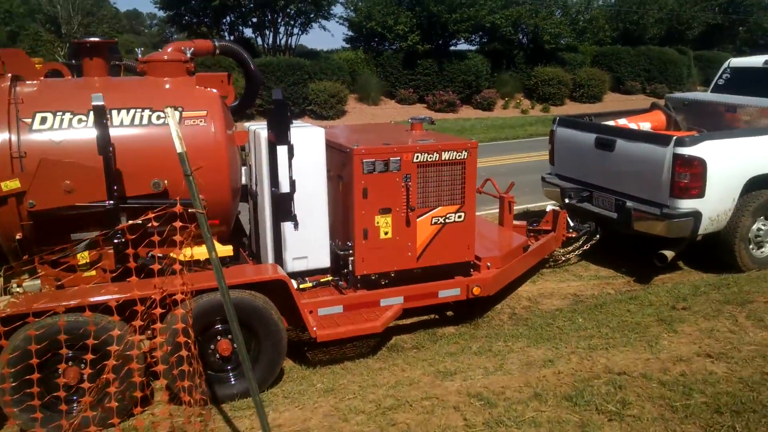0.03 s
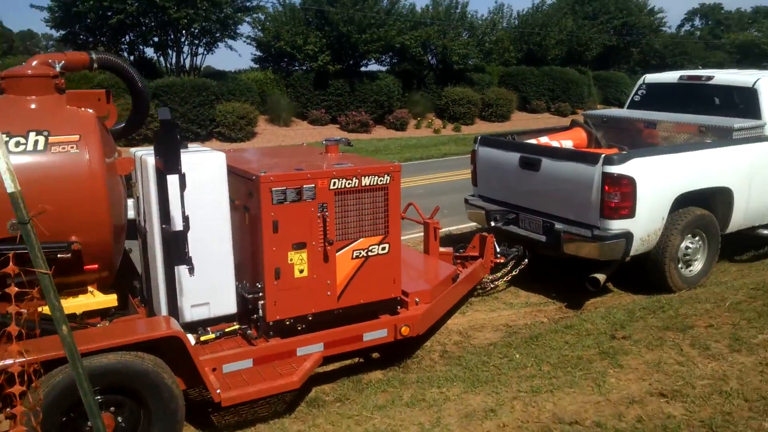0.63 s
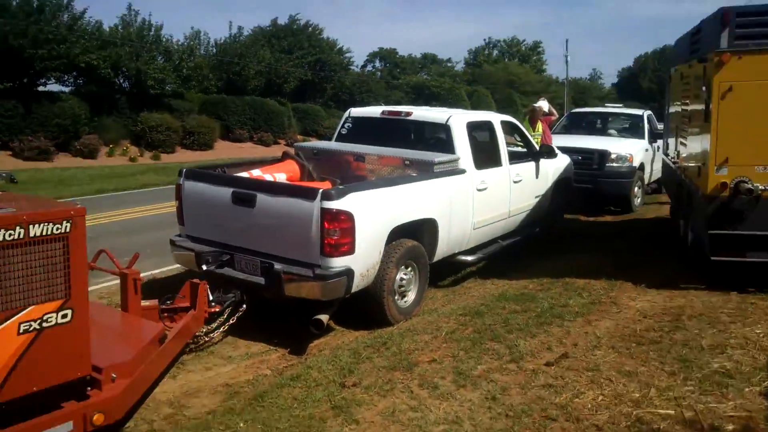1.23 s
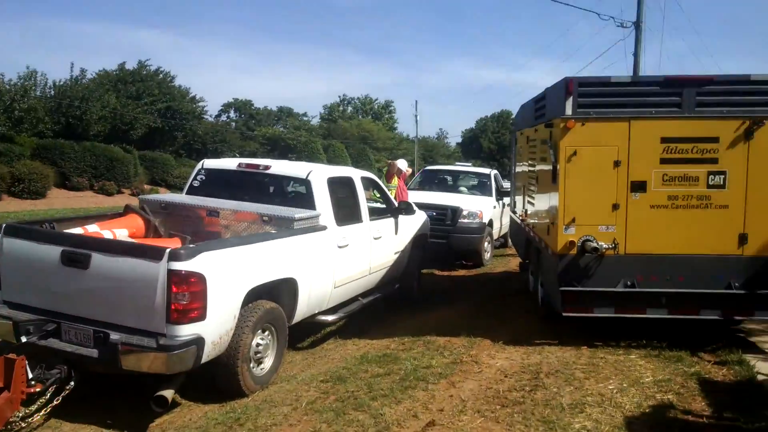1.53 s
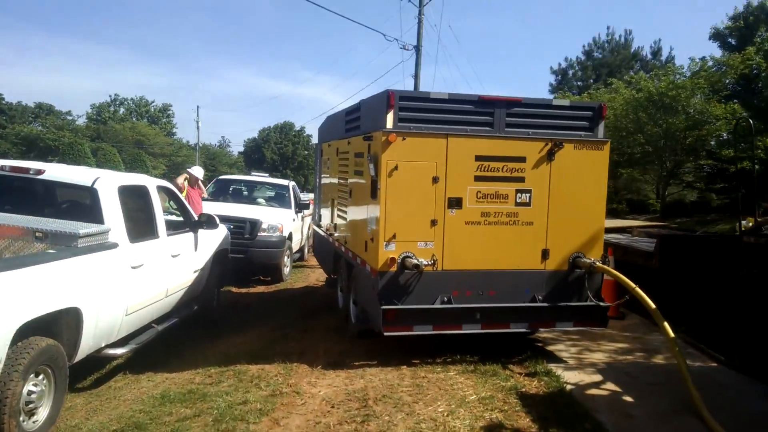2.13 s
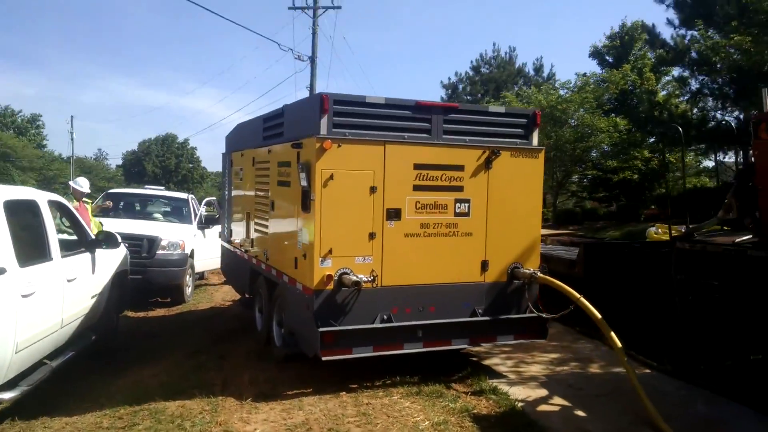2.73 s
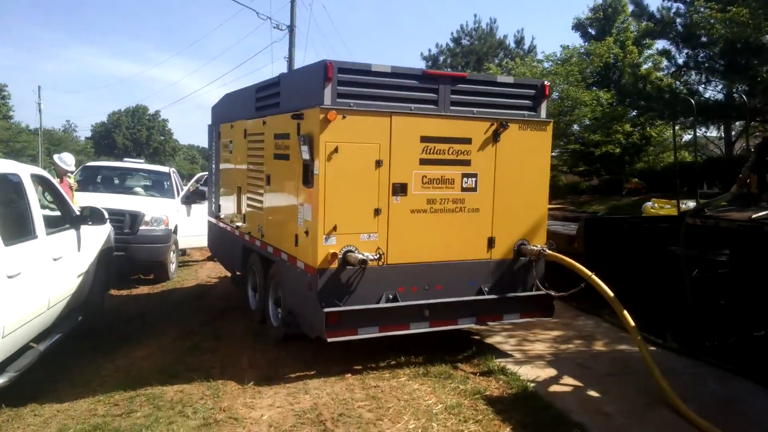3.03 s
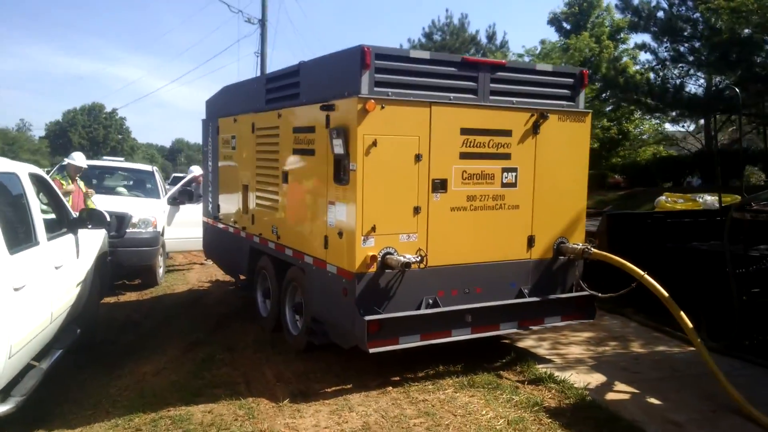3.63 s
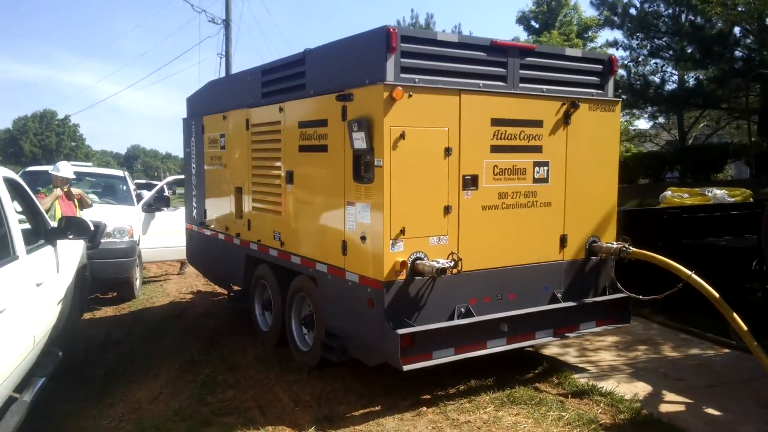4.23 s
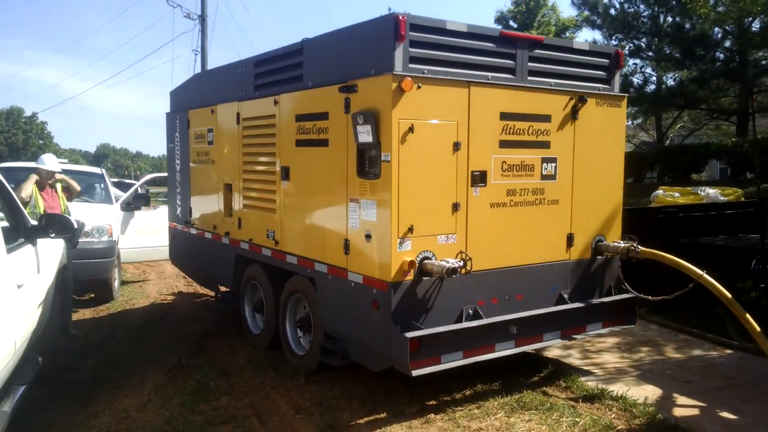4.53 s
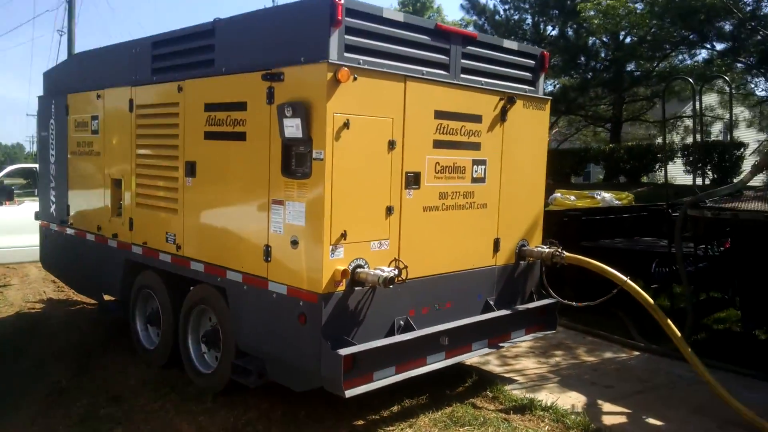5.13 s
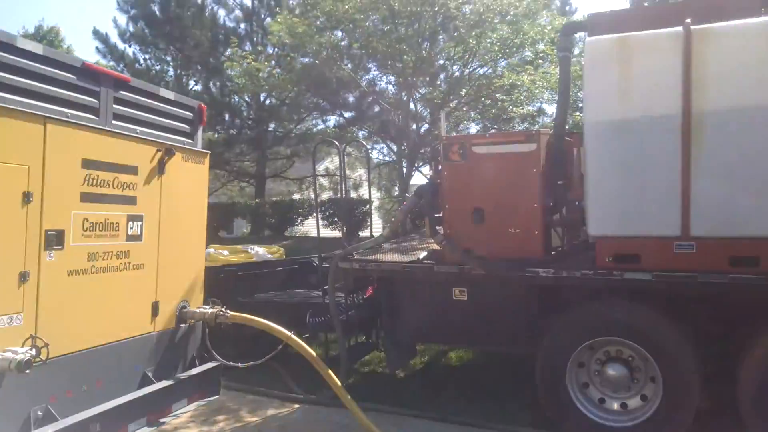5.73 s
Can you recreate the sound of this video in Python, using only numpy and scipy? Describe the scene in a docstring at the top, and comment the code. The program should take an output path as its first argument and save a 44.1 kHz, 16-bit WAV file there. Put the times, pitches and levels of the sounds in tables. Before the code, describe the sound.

A bright, sizzling hiss of escaping air runs nonstop above droning diesel machinery, heard while walking toward a large compressor.

```python
"""An outdoor drilling site, heard on a walk toward a big compressor. Two diesel exhausts beat against
each other under a steady roar, a fan hums at harmonics of its blade rate, and an engine passing on the
road sinks in pitch. Turbulent air rushes through the compressor's louvres, louder with nearness, and
compressed air hisses loudly over it all. Wind buffets the microphone twice. Its two close ports,
subtracted crosswise, give the air noise its stereo image by interference."""
import sys
import numpy as np
from scipy import signal
from scipy.fft import rfft, irfft, next_fast_len
from scipy.io import wavfile
from scipy.ndimage import uniform_filter1d, map_coordinates

SR = 44100
rng = np.random.default_rng(int(sys.argv[2]) if len(sys.argv) > 2 else 0)


def materialize(psi):
    """Save the field psi as 16-bit PCM at rate SR to the path in sys.argv[1].

    A 1-D psi becomes a single channel; in a 2-D psi each row is a channel.
    """
    bounded = np.clip(np.atleast_2d(psi).T, -1, 1)
    quanta = np.round(bounded * 32767).astype(np.int16)
    wavfile.write(sys.argv[1], SR, quanta)


N = 263718
TIME = np.arange(N) / SR


def amp(db):
    """Amplitude ratio of a level in decibels."""
    return 10 ** (np.asarray(db) / 20)


def unit(x):
    """Normalisation to an rms of 1."""
    return x / np.sqrt(np.mean(x ** 2) + 1e-20)


def along(points, hz):
    """Interpolation of (f/Hz, value) points on a logarithmic frequency axis."""
    f, values = np.transpose(points)
    return np.interp(np.log(hz + 1), np.log(f + 1), values)


def curves(rows):
    """Linear interpolation in time of each column after t/s."""
    times, *columns = np.transpose(rows)
    return [np.interp(TIME, times, column) for column in columns]


def wobble(rate):
    """Smooth random modulation: a spline through rate knots a second."""
    return map_coordinates(rng.standard_normal(256), [TIME * rate], mode="wrap")


def swell(top_s, width_s):
    """Gaussian envelope: 1 at its top, 1/e at width_s to either side."""
    return np.exp(-((TIME - top_s) / width_s) ** 2)


def plateau(start_s, end_s, attack_s, release_s):
    """Trapezoidal envelope: it rises from start_s and sinks from end_s."""
    return np.clip((TIME - start_s) / attack_s, 0, 1) - np.clip((TIME - end_s) / release_s, 0, 1)


def filtered(x, response):
    """Linear filtering: the spectrum times a complex frequency response."""
    size = next_fast_len(N + SR // 2)
    return irfft(rfft(x, size) * response(np.fft.rfftfreq(size, 1 / SR)), size)[..., :N]


def turbulence(spectrum, patchy_db, frames=50):
    """Turbulent noise: two independent coloured noises share narrow streaks of gain, frames long."""
    spectra = signal.stft(rng.standard_normal((2, N)), nperseg=1024)[2]
    streaks = uniform_filter1d(rng.standard_normal(spectra.shape[1:]), size=4, axis=0)
    streaks = uniform_filter1d(streaks, size=frames, axis=1)
    pair = signal.istft(spectra * amp(patchy_db * streaks / streaks.std()), nperseg=1024)[1][:, :N]
    return filtered(pair, lambda hz: amp(along(spectrum, hz)))


def paired(noises, correlation, stretch=None):
    """Partial coherence: two noises, as mid and side, are weighted for a correlation at each frequency."""
    hz, t, spectra = signal.stft(noises, SR, nperseg=1024)
    scale = np.interp(t, *np.transpose(stretch)) if stretch else 1
    angle = np.arccos(np.clip(along(correlation, hz[:, None] / scale), -1, 1)) / 2
    mid, side = signal.istft(spectra * np.array([np.cos(angle), np.sin(angle)]), nperseg=1024)[1][:, :N]
    return np.array([mid + side, mid - side])


# Low sound, left channel relative to right: f/Hz, level/dB
LEFT_LEVEL = [(45, -11), (90, -7.5), (160, -6.5), (230, -0.5), (400, -1.5), (700, 1.5), (1300, -1)]
# Phase lead of the left channel: f/Hz, phase/rad
LEFT_LEAD = [(45, 0.62), (100, 0.97), (250, 0.9), (500, 0.81), (1000, 0.39), (1600, 1)]

def placed(x):
    """Localisation by phase and level: low sound is earlier on the left, mostly louder on the right."""
    def response(hz):
        left = amp(along(LEFT_LEVEL, hz)) * np.exp(1j * along(LEFT_LEAD, hz))
        return np.array([left, np.ones_like(left)]) * 2 / np.abs(1 + left)
    return filtered(x, response)


# Air noise at the two ports: f/Hz, correlation (clipped to -1..1 in use)
PORT_CORRELATION = [(1300, 1), (2050, 0.054), (2300, -1.156), (2720, -1.09), (2950, 0.57), (3600, 0.57),
                    (4300, -0.0017), (4650, -1.1), (5350, -2.24), (5700, -0.14), (6300, 0.28), (7000, 0.1)]
# Drift of the hollows: t/s, stretch of that pattern along frequency
HOLLOW_DRIFT = [(0, 0.95), (.55, .93), (1.0, 0.95), (1.3, 1.018), (1.62, 1.023), (1.8, 0.99), (2.1, 0.975),
                (2.5, 1.004), (3.6, 1.012), (4.3, 0.97), (5.15, 1.006), (5.5, 0.97), (5.98, 0.98)]

def hollowed(noises):
    """Antiphase: the hiss has hollows near 2.5 and 5 kHz, where the channels oppose."""
    return paired(noises, PORT_CORRELATION, HOLLOW_DRIFT)


# Cross-feed between the ports: f/Hz, share subtracted
CROSS_SHARE = [(3000, 1), (4000, 0.87), (5200, 0.073), (7500, 1)]

def crossed(ports, delay_s=0.000391):
    """Comb filtering: each channel is its own port minus a delayed share of the other."""
    def feed(hz):
        return np.clip(along(CROSS_SHARE, hz), 0, 1) * np.exp(-2j * np.pi * hz * delay_s)
    return ports - filtered(ports[::-1], feed)


# Gusts: t/s, half width/s, level/dB
GUSTS = [(0.13, 0.075, -25), (5.92, 0.06, -33)]
# Their spectrum: f/Hz, relative level/dB
GUST_SPECTRUM = [(12, -35), (35, -20), (70, -8), (110, -7), (200, -20), (600, -71)]

def wind(lee_db=-16):
    """Turbulent pressure buffets the left port; the right one lies in the lee."""
    push = sum(amp(db) * swell(t, width) for t, width, db in GUSTS)
    return push * amp([[0], [lee_db]]) * unit(turbulence(GUST_SPECTRUM, patchy_db=2))


# Beams of the fan crossed on the walk: harmonic number, entry t/s, exit t/s, gain/dB
FAN_BEAMS = [(3, -1.2, 0.13, 12), (3, 0.46, 0.77, 15), (3, .77, 1.0, 7), (3, 3, 3.7, 7.5),
             (2, 0.89, 1.68, 11), (2, 1.68, 2.3, 8.5), (2, 2.3, 2.95, 13), (2, 2.95, 3.55, 10.5),
             (2, 3.55, 4.5, 6)]

def fan(blade_hz=129.05, off_beam_db=-45, edge_s=0.065):
    """Directivity: each harmonic of the blade-passing frequency is louder inside its own beams."""
    phase = 2 * np.pi * (blade_hz * TIME + 0.015 * wobble(2))
    hum = np.zeros(N)
    for k in (2, 3, 4):
        beam_db = sum(db * plateau(enter, leave, edge_s, edge_s)
                      for harmonic, enter, leave, db in FAN_BEAMS if harmonic == k)
        hum += amp(off_beam_db + beam_db) * np.sin(k * phase)
    return placed(np.sqrt(2) * hum)


# Engine on the road: t/s, cycle rate f/Hz, firing note level/dB
PASS_BY = [(3.4, 80.7, -56), (3.95, 79.3, -36.5), (4.25, 78.6, -29), (4.45, 77.3, -33), (4.6, 75.8, -25),
           (4.87, 75.4, -27), (5.1, 75.5, -43), (5.3, 75.85, -29.5), (5.48, 75.5, -42), (5.65, 74.8, -33),
           (5.98, 75, -44)]
# Its other partials: multiple of the cycle rate, level/dB when closest
PASS_ORDERS = [(2, -34), (4, -29.5), (9, -33)]

def passing_engine(firings_per_cycle=3, closest_s=4.45, jitter_cycles=0.009):
    """Doppler shift: the note sinks as the engine goes by; other partials show only when it is closest."""
    cycle_hz, level_db = curves(PASS_BY)
    cycles = np.cumsum(cycle_hz) / SR
    def partial(k):
        return np.sin(2 * np.pi * k * (cycles + jitter_cycles * wobble(9.6)))
    partials = swell(closest_s, width_s=0.14) * sum(amp(db) * partial(k) for k, db in PASS_ORDERS)
    note = amp(level_db) * partial(firings_per_cycle)
    return placed(np.sqrt(2) * (note + partials))


# The diesels' roar: f/Hz, relative level/dB
ROAR_SPECTRUM = [(15, -28), (35, 1), (65, -9.5), (105, 0.5), (145, -5), (190, -2.5), (240, 1.5), (330, 1),
                 (540, 1), (750, -4.5), (1000, -8.5), (1500, -20.5), (2000, -17), (2350, -56), (6000, -80)]
# Its likeness in the two channels: f/Hz, correlation
ROAR_CORRELATION = [(30, .2), (100, 0.64), (300, 0.7), (700, 0.86), (1500, 0.19)]

def roar(firings, level_db=-26, pulse_depth=0.024, clatter_db=-8):
    """Noise is amplitude-modulated at the firing rate; knocks recurring every four firings add lines."""
    noise = paired(turbulence(ROAR_SPECTRUM, patchy_db=1.2), ROAR_CORRELATION)
    pulsing = noise * (1 + pulse_depth * np.cos(2 * np.pi * firings))
    cycle = rng.standard_normal(4096)
    knocks = map_coordinates(cycle, [firings / 4 % 1 * len(cycle)], order=1)
    clatter = filtered(knocks, lambda hz: amp(along(ROAR_SPECTRUM, hz)))
    return amp(level_db) * (unit(pulsing) + amp(clatter_db) * unit(clatter))


# Swelling bands of the roar: t/s, half width/s, f/Hz, level/dB
SURGES = [(.9, .2, 340, -31), (.88, .1, 740, -36), (1.2, 0.27, 586, -35), (1.298, .3, 750, -37),
          (3.0, 0.08, 530, -31), (3.102, 0.55, 380, -35), (3.43, .13, 760, -31), (3.885, 0.11, 490, -29),
          (5.52, 0.1, 545, -31), (5.869, 0.11, 540, -30)]

def surges(half_width_hz=94):
    """Narrow-band noise: parts of the roar swell and fade along the walk between the vehicles."""
    bands = np.zeros((2, N))
    for t, width, hz, db in SURGES:
        band = filtered(rng.standard_normal((2, N)), lambda f: np.exp(-((f - hz) / half_width_hz) ** 2))
        bands += amp(db) * swell(t, width) * unit(band)
    return placed(paired(bands, ROAR_CORRELATION))


# Places where the engines boom: entry t/s, exit t/s, f/Hz, level/dB
BOOMS = [(.1, 0.504, 118.6, -32), (0.993, 1.397, 114, -34.5), (2.8, 3.713, 119, -34),
         (5.4, 5.907, 120, -39.5), (-.3, 1.1, 82.7, -39), (2.8, 3.7, 82.7, -38), (3.3, 3.903, 165.4, -37),
         (1.02, 1.45, 229, -38), (3.05, 3.98, 248.1, -31), (3.98, 4.45, 248.1, -36),
         (4.95, 5.6, 248.1, -38), (5.6, 5.95, 248.1, -32)]

def booms(edge_s=0.16):
    """An uneven sound field: single engine overtones stand out on stretches of the walk."""
    return np.sqrt(2) * sum(amp(db) * plateau(enter, leave, edge_s, edge_s) * np.sin(2 * np.pi * hz * TIME)
                            for enter, leave, hz, db in BOOMS)


# The walk toward the compressor: t/s, distance/m
DISTANCE = [(0, 16), (1.2, 9.5), (2.6, 5.3), (4.2, 4.2), (4.9, 4.2), (5.45, 3.3), (5.98, 5.2)]

def nearness():
    """Spherical spreading: pressure goes as 1/distance, with a gain of 1 at the end of the walk."""
    distance, = curves(DISTANCE)
    return distance[-1] / distance


def firing_count(hz, hunt_cycles, in_step_s=0.0655):
    """Phase modulation: the governor hunts, so the count of firings strays by a fraction of a cycle."""
    return hz * (TIME - in_step_s) + hunt_cycles * wobble(1.487)


def exhaust(firings, orders, waver_db, jitter_cycles):
    """Harmonic series of the firing rate; overtones waver in level and shake with uneven firings."""
    note = np.zeros(N)
    for k, db in orders:
        is_overtone = k > 1
        offset = is_overtone * (rng.random() + jitter_cycles * wobble(25))
        level_db = db + (waver_db if is_overtone else 1.0) * wobble(3.88)
        note += amp(level_db) * np.sin(2 * np.pi * (k * firings + offset))
    return np.sqrt(2) * note


# Exhausts of the slow and the fast diesel: harmonic number, level/dB
SLOW_ORDERS = [(1, -33), (2, -44), (3, -42), (4, -38.5), (5, -41.5), (8, -46)]
FAST_ORDERS = [(1, -33.5), (2, -40), (3, -48.5), (5, -43)]
# The slow diesel's drone near the compressor: harmonic number, level/dB at the end of the walk
DRONE_ORDERS = [(12, -42.5), (13, -42.5), (14, -44), (18, -52.5), (20, -45.5), (24, -46), (28, -53)]

def diesels(slow_hz=41.353, fast_hz=47.428):
    """Beats: two exhaust notes throb at their difference frequency, six times a second, in the roar."""
    slow = firing_count(slow_hz, hunt_cycles=0.025)
    fast = firing_count(fast_hz, hunt_cycles=0.02)
    notes = exhaust(slow, SLOW_ORDERS, waver_db=1.0, jitter_cycles=0.077)
    notes += exhaust(fast, FAST_ORDERS, waver_db=3.0, jitter_cycles=0.029)
    drone = nearness() * exhaust(slow, DRONE_ORDERS, waver_db=1.0, jitter_cycles=0.09)
    return placed(notes + drone + booms() + roar(slow))


# Air in the compressor's louvres: f/Hz, relative level/dB
COOLING_SPECTRUM = [(350, -46), (550, 2.5), (750, 1), (1100, 1), (1550, -0.5), (1950, -2), (2800, 3),
                    (3600, -4.5), (4400, -16), (5200, -23), (7000, -13.5), (12000, -22.5)]

def cooling_air(final_level_db=-28.5):
    """Flow noise: air rushes through the louvres, louder as the distance shrinks."""
    ports = hollowed(turbulence(COOLING_SPECTRUM, patchy_db=2.0, frames=8))
    return amp(final_level_db) * nearness() * unit(crossed(ports))


# Hiss off the trucks' panels: t/s, half width/s, mirrored level/dB, scattered level/dB relative to it
REFLECTIONS = [(1.35, 0.3, -32, -30), (1.75, 0.13, -35, -1), (2.7, .25, -35, -30), (4.49, 0.05, -37, 7),
               (5.53, 0.1, -29, -2)]
# Its spectrum: f/Hz, relative level/dB
REFLECTED_SPECTRUM = [(2700, -42), (3100, 0), (3800, 1), (5000, 9), (6800, -4), (9000, -20), (12000, -40)]

def reflections():
    """Specular reflection keeps the hiss's spectral hollows; diffuse sound fills the one near 5 kHz."""
    mirrored = unit(crossed(hollowed(turbulence(REFLECTED_SPECTRUM, patchy_db=1.5))))
    scattered = unit(crossed(turbulence(REFLECTED_SPECTRUM, patchy_db=1.5)))
    return sum(amp(db) * swell(t, width) * (mirrored + amp(scatter_db) * scattered)
               for t, width, db, scatter_db in REFLECTIONS)


# Glints of the sizzle: t/s, half width/s, f/Hz at the peak, level/dB
GLINTS = [(0.42, 0.5, 11270, -25), (0.298, 0.57, 13200, -25), (0.703, 0.45, 10200, -25),
          (1.45, 0.51, 11430, -27.5), (1.508, 0.17, 8700, -32), (1.969, 0.35, 10800, -24.5)]

def glints(half_width_hz=470, sag_hz_per_s=600):
    """Narrow-band noise on a falling carrier: bands flare and slide as the listener moves through them."""
    flares = np.zeros((2, N))
    for t, width, hz, db in GLINTS:
        band = filtered(rng.standard_normal((2, N)), lambda f: np.exp(-(f / half_width_hz) ** 2))
        phase = 2 * np.pi * np.cumsum(hz - sag_hz_per_s * (TIME - t)) / SR
        flares += amp(db) * swell(t, width) * unit(crossed(band * np.sin(phase)))
    return flares


def jet(spectrum, far_port_db, scatter_db, patchy_db, frames=50):
    """Acoustic shadow: the housing shades one port from a jet's treble; the highest hiss scatters round."""
    def shadow(hz):
        gains = np.array([np.ones_like(hz), amp(along([(6300, 0), (9500, far_port_db)], hz))])
        return gains / np.linalg.norm(gains, axis=0)
    def scattering(hz):
        return amp(scatter_db + along([(5400, -44.0), (7600, 6.5), (10500, 2.0)], hz))
    ports = hollowed(turbulence(spectrum, patchy_db, frames))
    direct = crossed(filtered(ports, shadow))
    scattered = filtered(turbulence(spectrum, patchy_db), scattering)
    return unit(direct + scattered)


# Escaping air, broad hiss and sharp sizzle: f/Hz, relative level/dB
HISS_SPECTRUM = [(1000, -18.5), (2000, -12.5), (2800, -5), (3600, -5.5), (4400, -1.5), (5200, 3),
                 (5900, -2), (7000, 1.5), (8200, -2), (9600, 1.2), (12300, -2), (14500, 1.5), (15500, 2),
                 (16500, -38)]
SIZZLE_SPECTRUM = [(7500, -31), (9600, 0), (10400, 0), (11100, 3), (11700, 2), (12300, -0.5), (13100, -2),
                   (13900, -1.5), (14500, -4), (15000, -11), (15500, -10), (16500, -40)]
# Course of the sizzle: t/s, level/dB
SIZZLE_LEVEL = [(0, -21.5), (.5, -18.5), (1.1, -24), (2.0, -21.5), (2.5, -19.5), (4.2, -22.5), (5.4, -23),
                (5.98, -25.5)]

def compressed_air(hiss_db=-19.0, flicker_db=0.35):
    """Broadband noise: a steady hiss and a glinting sizzle, with a slight fast flicker in level."""
    hiss = amp(hiss_db) * jet(HISS_SPECTRUM, far_port_db=-12, scatter_db=-6.5, patchy_db=1.7, frames=10)
    sizzle_db, = curves(SIZZLE_LEVEL)
    sizzle = amp(sizzle_db) * jet(SIZZLE_SPECTRUM, far_port_db=-14, scatter_db=-4.0, patchy_db=5.0)
    return amp(flicker_db * wobble(16)) * (hiss + sizzle + glints())


# Brief ducks in gain: t/s, hold/s, depth/dB
DUCKS = [(0.062, 0.18, 1.2), (0.582, 0.047, 1), (1.674, 0.032, .7), (2.209, 0.12, 1.3), (3.622, 0.073, 1.2),
         (3.972, 0.066, 1.1), (4.19, 0.16, .7), (4.663, 0.071, 1), (5.026, 0.062, 1.5), (5.627, 0.066, 1)]

def ducking(fall_s=0.0041, recover_s=0.082):
    """Gain reduction at set times: the level ducks briefly, as under a limiter, then recovers."""
    return amp(-sum(db * plateau(t, t + hold, fall_s, recover_s) for t, hold, db in DUCKS))


def scene():
    """Superposition: engines, fan and air add; the ducking gain scales the sum, and wind comes on top."""
    air = cooling_air() + compressed_air() + reflections()
    mix = diesels() + surges() + fan() + passing_engine() + air
    return ducking() * mix + wind()


def record(dry, top_hz=15560):
    """Band limiting: an ideal low-pass filter removes the highest treble."""
    return filtered(dry, lambda hz: hz < top_hz)


dry = scene()
out = record(dry)
materialize(out)
```